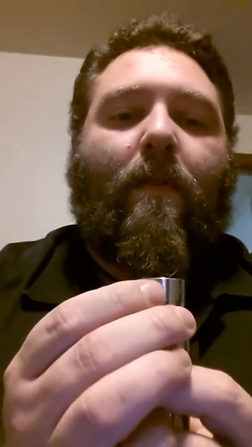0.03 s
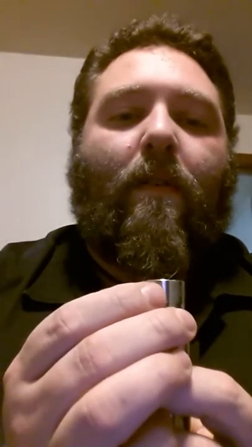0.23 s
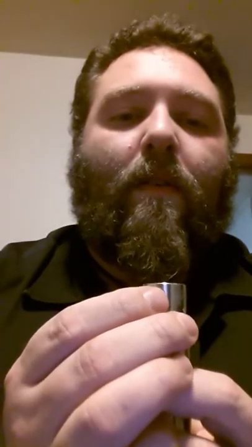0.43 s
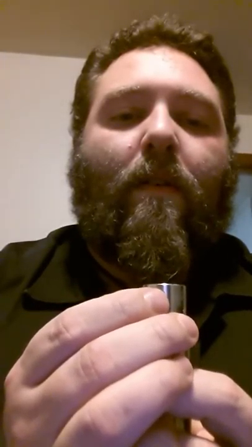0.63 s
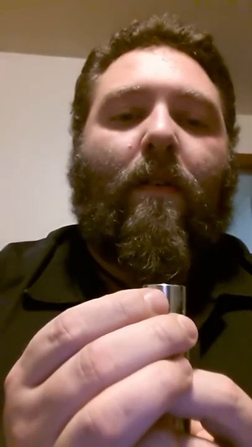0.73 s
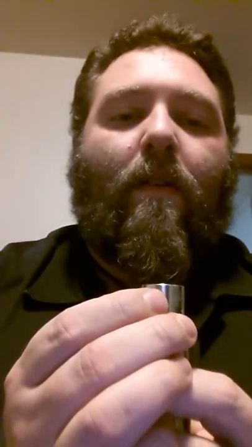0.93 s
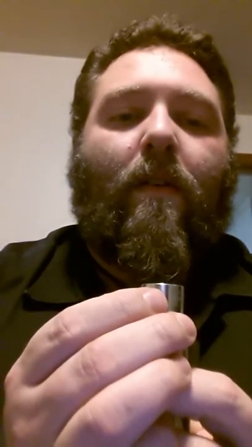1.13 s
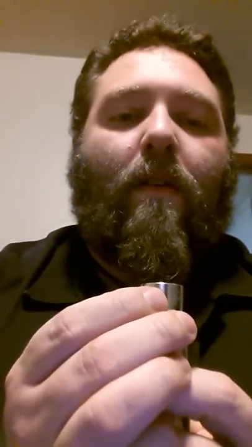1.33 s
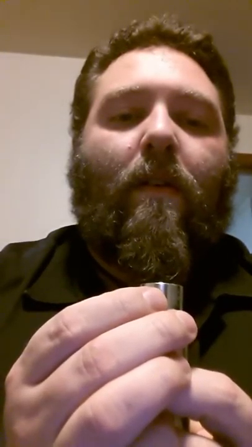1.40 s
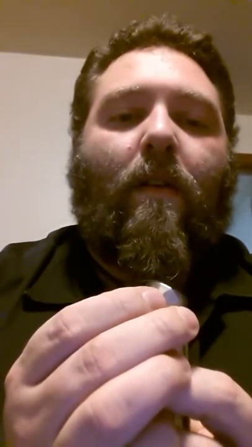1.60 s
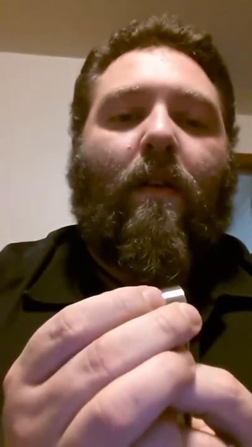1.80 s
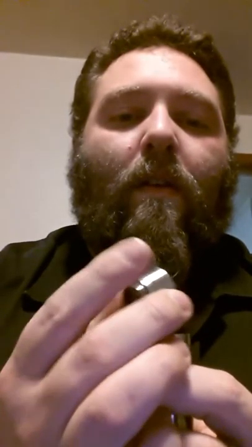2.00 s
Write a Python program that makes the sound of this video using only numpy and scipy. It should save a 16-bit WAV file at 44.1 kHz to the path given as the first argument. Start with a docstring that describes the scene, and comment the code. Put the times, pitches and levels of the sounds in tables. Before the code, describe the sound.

A sharp metallic snap of small magnetic steel parts dominates at about 1.65 s, chattering for 0.04 s with a short bright tail. Before it, very quiet finger bumps at 0, 0.5 and 0.75 s, a faint rustle near 0.85, a tiny tick at 1.28 and a thin squeak around 1.5. A much lighter double click follows at 1.85. Close phone microphone, quiet room, faint hum and hiss.

```python
"""Close to a phone in a quiet room, soft handling bumps and a rustle come first, then a faint tick and a thin squeak.
After a soft swell of noise and a knock, small steel parts snap together under magnetic pull and chatter briefly;
a lighter click follows as they are shifted. The damped steel is a set of short sine modes with short bright
noise bursts. Clean partials and bands of decaying noise follow each snap, as a short bright wash of noise.
A faint hum, a thin whistle and shaped noise lie under everything."""
import sys
import numpy as np
from scipy import signal
from scipy.fft import rfft, irfft
from scipy.io import wavfile
from scipy.ndimage import uniform_filter1d

SR = 44100
rng = np.random.default_rng(int(sys.argv[2]) if len(sys.argv) > 2 else 0)


def digitize_waveform(pressure):
    """Quantize a signal to 16-bit integers and store it at the path in sys.argv[1].

    Rows of a 2-D input are taken as channels; values are limited to [-1, 1].
    """
    field = np.atleast_2d(pressure).T
    bounded = np.clip(field, -1, 1)
    quanta = np.round(bounded * 32767).astype(np.int16)
    wavfile.write(sys.argv[1], SR, quanta)


N = 90493  # length in samples

# How the snap and the later click excite the lingering sound.
# Each row: start in seconds, level in dB, then body ring, clink and broad wash in dB on top of that level.
SNAPS = [(1.6510, -1.5, -0.5, -1, -1), (1.8533, -19, -14, -6, 9.5)]


def undb(db):
    """Decibels to gain."""
    return 10 ** (np.asarray(db) / 20)


def pan(db):
    """Left and right gains for a left-minus-right level difference in dB."""
    return undb(np.array([[db], [-db]]) / 2)


def since(start):
    """Seconds since a moment, zero before it."""
    return np.maximum(np.arange(N) / SR - start, 0)


def decay(age, t60):
    """Exponential fade that falls 60 dB in t60 seconds."""
    return np.exp(-np.log(1000) * age / t60)


def swell(start, rise, hold, t60):
    """Linear rise, hold, exponential release; all times in seconds."""
    age = since(start)
    attack = np.minimum(age / max(rise, 1 / SR), 1)
    return attack * decay(np.maximum(age - rise - hold, 0), t60)


def walk(rate):
    """Slow random wander, moving to a new value `rate` times a second, with a spread near 1."""
    step = int(SR / rate)
    targets = rng.standard_normal(N // step + 1)
    return uniform_filter1d(np.repeat(targets, step), step)[:N]


def over_bins(points):
    """A (Hz, value) table spread over the spectrum on a log axis."""
    hz, value = np.array(points).T
    return np.interp(np.log(np.fft.rfftfreq(N, 1 / SR) + 1), np.log(hz), value)


def noise(gain):
    """Stereo noise of rms 1 with the given spectrum; the sides agree in the low mids and part in the treble."""
    # Likeness of the two sides. Each row: frequency in Hz, correlation from 0 to 1.
    likeness = [(40, 0.37), (130, 0.96), (300, 1), (700, 0.7), (2000, 0.29), (10000, .05)]
    alike = np.clip(over_bins(likeness), 0, 1)
    spectra = rfft(rng.standard_normal((2, N))) * gain
    mid, side = spectra * np.sqrt([1 + alike, 1 - alike])
    out = irfft(np.array([mid + side, mid - side]), N)
    return out / out.std()


def tone(hz, db, drift_hz):
    """A sine of the given rms level whose loudness and pitch wander slightly."""
    waver_db = 1
    level = np.sqrt(2) * undb(db + waver_db * walk(10.25))
    cycles = np.cumsum(hz + drift_hz * walk(18)) / SR
    return level * np.sin(2 * np.pi * cycles)


def is_clink(hz):
    """Modes from 4 to 5 kHz form the bright clink, levelled apart from the body of the steel."""
    return 4000 < hz < 5000


def contacts():
    """Each contact rings the damped steel for a few milliseconds under a noise burst; small parts radiate no bass."""
    # Touches of the parts. Each row: start in seconds, level in dB, level of the body modes in dB, pitch ratio.
    touches = [(1.2773, -52, -10, 1.04), (1.6502, -2.5, 1.5, 1.0), (1.6562, -9.5, -9, 0.96),
               (1.6588, -17, -4, 1.12), (1.662, -16, -12, 1.0), (1.672, -25, -18, 0.88),
               (1.6756, -18, -13, 1.0), (1.6818, -14.5, -8, 1.0), (1.6866, -24, -11, .98),
               (1.6889, -23, -6, 1.0), (1.8520, -37.5, -6.5, 1.03), (1.8564, -16.5, -8, 1.017),
               (1.866, -27.5, -9.5, 1.08), (1.8743, -28, -7.5, 1.03), (1.8772, -26.5, -15, 1.025)]
    # Finger-damped modes of the steel. Each row: frequency in Hz, left level in dB, right level in dB,
    # build-up in seconds, 60 dB decay in seconds.
    modes = [(2156, -7, -14.5, 0.00027, 0.013), (2950, -2, -11.5, 0.00033, 0.0037),
             (3530, -1, -17, 0.00064, .0035), (4450, 7.5, -13.5, 0.0019, 0.0089),
             (4915, -13.5, -23, 0.00071, 0.015), (6050, -24, -10, .0004, 0.0042),
             (6990, -45, -24, .0003, .008), (1360, -18.5, -36.5, 0.00017, 0.01)]
    burst_db, burst_s = -35, 0.0029  # short burst of bright noise at the start of each contact
    steel_low_hz = 1300
    out = np.zeros((2, N))
    age = np.arange(SR // 10) / SR
    for start, db, body_db, pitch in touches:
        burst = rng.standard_normal((2, len(age))) * np.exp(-(age / burst_s) ** 2)
        hit = undb(burst_db + body_db) * burst
        for k, (hz, left_db, right_db, build, t60) in enumerate(modes):
            sign = (-1) ** k  # neighbouring modes start in opposite directions
            wave = sign * np.sin(2 * np.pi * hz * pitch * age)
            ring = wave * (1 - np.exp(-age / build)) * decay(age, t60)
            mode_db = 0 if is_clink(hz) else body_db
            hit = hit + undb([[left_db], [right_db]]) * undb(mode_db) * ring
        first = int(start * SR)
        out[:, first:first + len(age)] += undb(db) * hit
    return signal.sosfilt(signal.butter(2, steel_low_hz, "high", fs=SR, output="sos"), out)


def free_ring():
    """A few clean partials sing on after each snap, reaching each port at its own phase."""
    # Faint free ringing of the steel. Each row: frequency in Hz, left level in dB, right level in dB,
    # 60 dB decay in seconds.
    partials = [(2090, -31, -31, .19), (2125, -36.5, -32, .18), (2310, -40.5, -43, .14),
                (3565, -42.5, -43, .12), (4320, -26, -39, .11), (4473, -27.5, -37.5, .11),
                (4580, -32.5, -39, .12), (7200, -52, -44, .14)]
    rise_s = 0.014
    out = 0
    for start, db, body_db, clink_db, _ in SNAPS:
        for hz, left_db, right_db, t60 in partials:
            wave = np.sin(2 * np.pi * (hz * since(start) + rng.random((2, 1))))
            ring_db = db + (clink_db if is_clink(hz) else body_db)
            gain = undb([[left_db], [right_db]]) * undb(ring_db)
            out = out + gain * wave * swell(start, rise_s, 0, t60)
    return out


def lingering_wash():
    """Bands of decaying noise at the steel's resonances, over a broad noise wash that holds, then fades."""
    # Lingering resonances. Each row: centre in Hz, width in Hz, left level in dB, right level in dB,
    # 60 dB decay in seconds.
    resonances = [(2074, 160, -41.5, -38, 0.16), (2430, 450, -39.5, -44.5, 0.18),
                  (3400, 1300, -40, -44.5, .16), (4550, 300, -41, -44.5, 0.19), (5100, 1200, -47, -43, .16),
                  (6960, 520, -57.5, -41, .16)]
    # Colour of the broad wash. Each row: frequency in Hz, relative density in dB per Hz.
    wash_colour = [(40, -9), (90, 6.5), (250, 4), (600, 1), (1200, 2.5), (1750, -4.5), (3000, -6.5),
                   (6500, -8), (8800, -10), (10000, -8.5), (11200, -14), (13000, -8), (15000, -14)]
    ring_rise_s, ring_hold_s = 0.012, 0.021
    wash_rise_s, wash_hold_s, wash_t60_s = 0.003, 0.036, 0.16
    wash_base_db, wash_pan_db = -43, 3.5
    bins = np.fft.rfftfreq(N, 1 / SR)
    out = 0
    for hz, width, left_db, right_db, t60 in resonances:
        bell = np.exp(-((bins - hz) / width) ** 2 / 2)
        band = noise(bell) * undb([[left_db], [right_db]])
        for start, db, body_db, clink_db, _ in SNAPS:
            ring_db = db + (clink_db if is_clink(hz) else body_db)
            out = out + band * undb(ring_db) * swell(start, ring_rise_s, ring_hold_s, t60)
    wash = noise(undb(over_bins(wash_colour))) * pan(wash_pan_db)
    for start, db, _, _, wash_db in SNAPS:
        level = undb(wash_base_db + db + wash_db)
        out = out + wash * level * swell(start, wash_rise_s, wash_hold_s, wash_t60_s)
    return out


def handling():
    """Enveloped noise for the bumps, rustle and knock of the hands, a soft swell of noise leading into the
    snap, and wavering sines for a squeak."""
    # Soft bumps of the hands. Each row: start in seconds, level in dB, rise in seconds, 60 dB decay in seconds.
    bump_events = [(0.0, -53, 0.0075, 0.24), (0.484, -59.5, 0.008, 0.11), (0.737, -52.5, 0.019, 0.55),
                   (1.388, -62, .02, 0.33), (1.426, -60, 0.011, 0.18)]
    # A part slips in the grip: start in seconds, level in dB, rise in seconds, 60 dB decay in seconds.
    knock_event = (1.6383, -47, .0015, .035)
    # Dull colour of bumps and knock. Each row: frequency in Hz, relative density in dB per Hz.
    bump_colour = [(40, -42), (90, -9), (230, -0.5), (350, -6), (520, -2.5), (800, -14.5), (1500, -17.5),
                   (3000, -26), (12000, -32.5)]
    # Rustle of the grip: middle in seconds, level in dB, half length in seconds.
    rustle_event = (0.843, -62, 0.062)
    # A soft noise swells just before the snap: start in seconds, level in dB, rise in seconds,
    # 60 dB decay in seconds.
    hush_event = (1.631, -57, .018, .02)
    # Colour of rustle and soft swell. Each row: frequency in Hz, relative density in dB per Hz.
    rustle_colour = [(500, 5), (1500, 5), (3000, -5.5), (4600, 2.5), (6000, -3), (7300, 3.5), (9000, -11),
                     (14000, -8)]
    # Faint squeak of sliding steel: start in seconds, rise in seconds, 60 dB decay in seconds.
    squeak_event = (1.505, .035, 0.343)
    # Partials of the squeak. Each row: frequency in Hz, level in dB.
    squeak_partials = [(6428, -81), (6880, -76), (7542, -87)]
    hands_pan_db = 4.5

    bump_noise = noise(undb(over_bins(bump_colour)))
    bumps = bump_noise * sum(undb(db) * swell(start, rise, 0, t60)
                             for start, db, rise, t60 in bump_events + [knock_event])

    middle, db, half = rustle_event
    rustle_level = undb(db) * np.exp(-((since(0) - middle) / half) ** 2)
    start, db, rise, t60 = hush_event
    hush_level = undb(db) * swell(start, rise, 0, t60)
    soft_noise = (rustle_level + hush_level) * noise(undb(over_bins(rustle_colour)))

    start, rise, t60 = squeak_event
    squeak = sum(tone(hz, db, drift_hz=30) for hz, db in squeak_partials) * swell(start, rise, 0, t60)
    return (bumps + soft_noise) * pan(hands_pan_db) + squeak


def background():
    """Steady shaped noise for room and hiss, with wavering sines for an appliance's hum and a thin whistle."""
    # Colour of the room noise. Each row: frequency in Hz, relative density in dB per Hz.
    air_colour = [(25, -31.5), (45, -22), (62, -12), (90, -12.5), (150, -7.5), (178, -16.5), (215, -1),
                  (300, -9.5), (360, -12.5), (480, -7), (600, -13), (800, -13.5), (1100, -16),
                  (1400, -18.5), (3000, -24), (7000, -24.5), (10000, -26), (14000, -25.5)]
    # Lean of the room noise. Each row: frequency in Hz, left minus right level in dB.
    air_lean = [(80, -7), (200, 0.5), (600, 6), (1500, 8), (5000, 6.5), (12000, 3)]
    # Hum of an appliance. Each row: frequency in Hz, level in dB before panning.
    hum_tones = [(91, -79.5), (120, -78), (152, -81), (210, -75.5), (796.7, -78.5), (1115.5, -74)]
    # Thin electronic whistle. Each row: frequency in Hz, level in dB before panning.
    whistle_tones = [(9948, -91), (13001, -91)]
    air_db, hum_pan_db, hum_drift_hz = -65.5, 6, 1.2
    hum = sum(tone(hz, db, hum_drift_hz) for hz, db in hum_tones + whistle_tones)
    lean = undb(np.array([[1], [-1]]) * over_bins(air_lean) / 2)
    air = irfft(rfft(noise(undb(over_bins(air_colour)))) * lean, N)
    return air * undb(air_db) + hum * pan(hum_pan_db)


def scene():
    """The clicks, their ring and wash, the hands and the quiet room."""
    return contacts() + free_ring() + lingering_wash() + handling() + background()


def record(dry):
    """Sound reaches the right port a little late; the phone rounds the loudest peak and cuts the top steeply."""
    port_lag_s, top_hz = 0.0003, 14400
    overload = 0.91  # level at which the microphone saturates
    ports = np.array([dry[0], np.roll(dry[1], int(port_lag_s * SR))])
    rounded = ports / (1 + (ports / overload) ** 4) ** 0.25
    return signal.sosfilt(signal.ellip(8, 0.2, 70, top_hz, fs=SR, output="sos"), rounded)


dry = scene()
out = record(dry)
digitize_waveform(out)
```